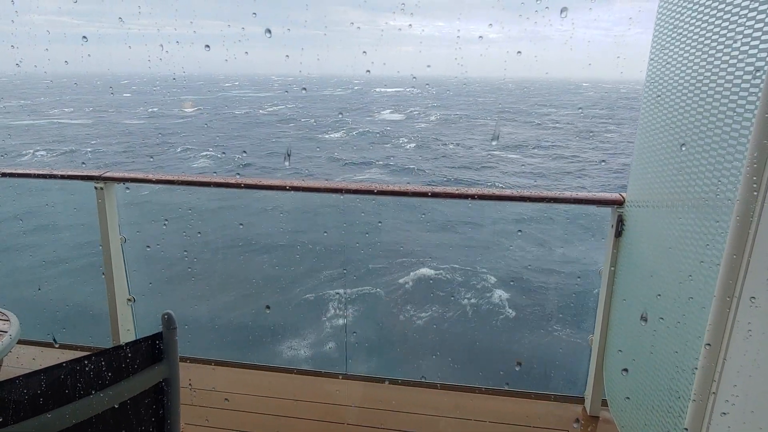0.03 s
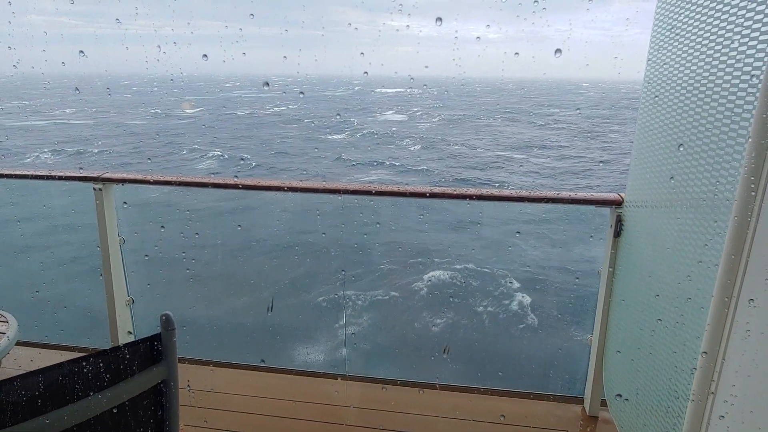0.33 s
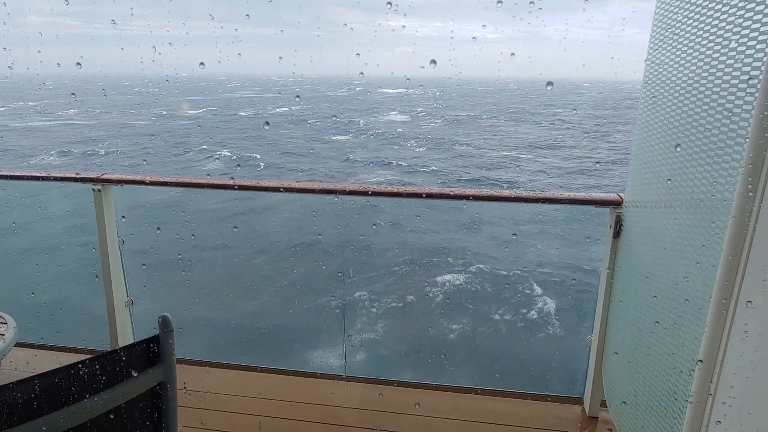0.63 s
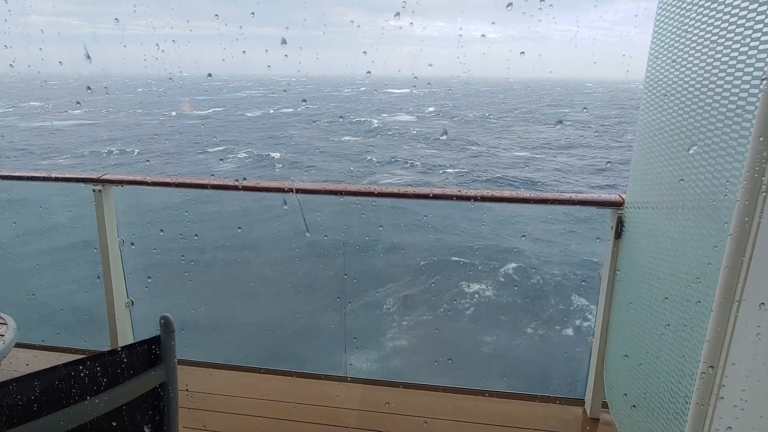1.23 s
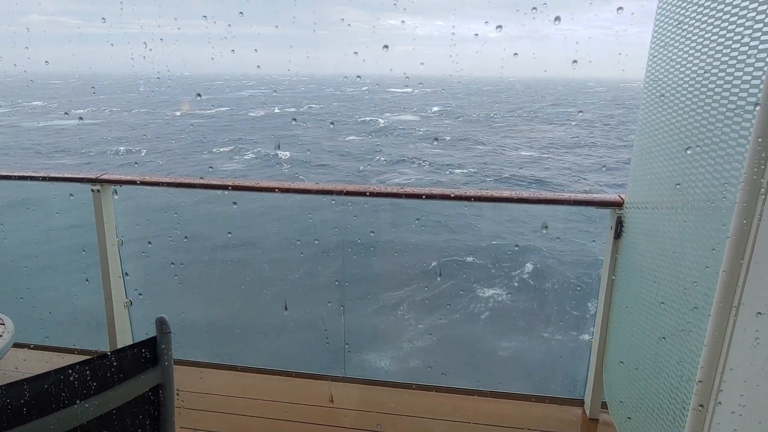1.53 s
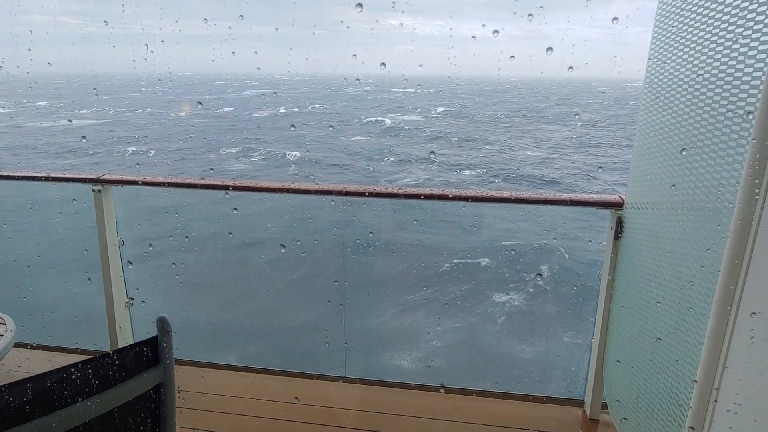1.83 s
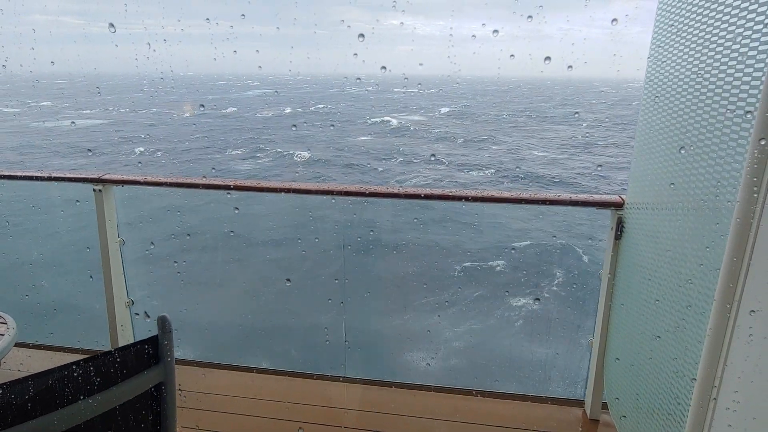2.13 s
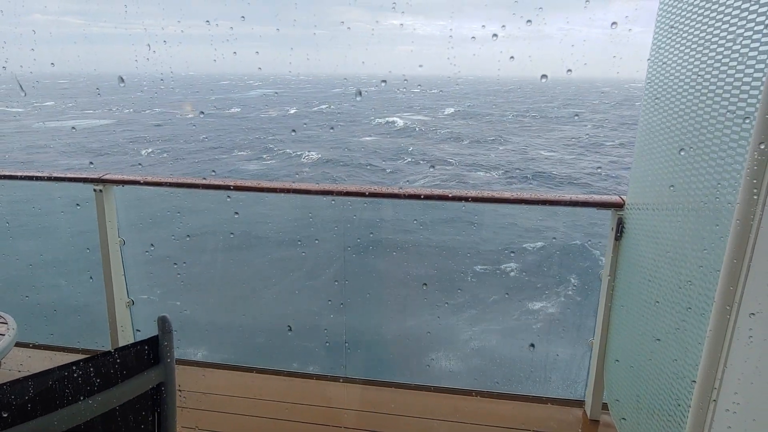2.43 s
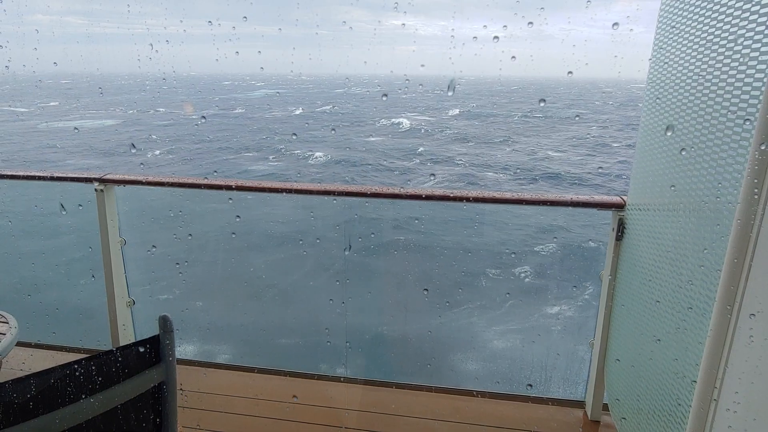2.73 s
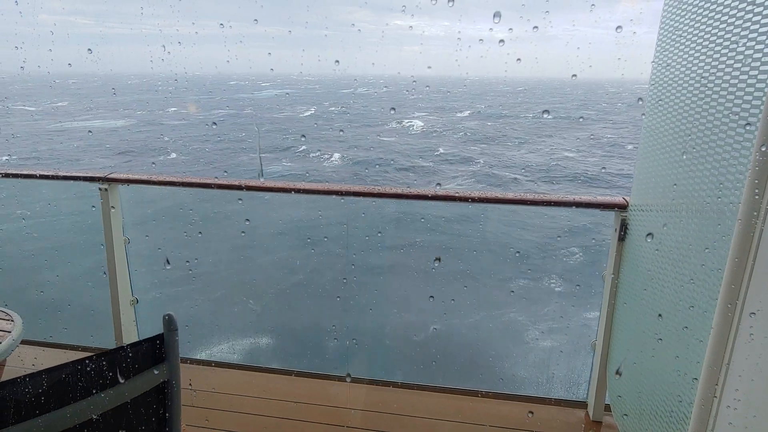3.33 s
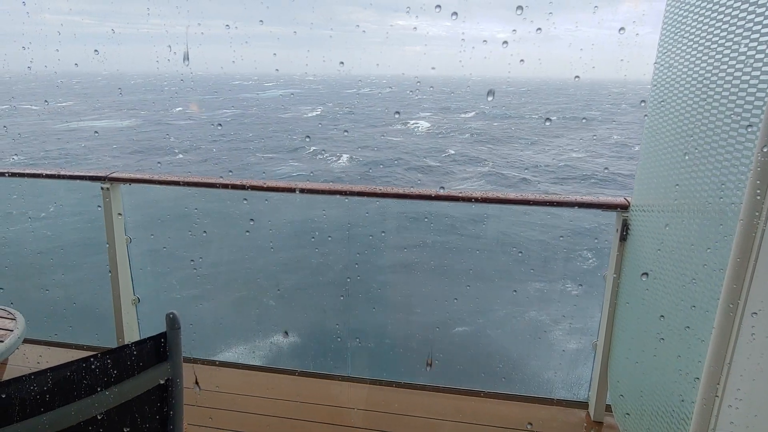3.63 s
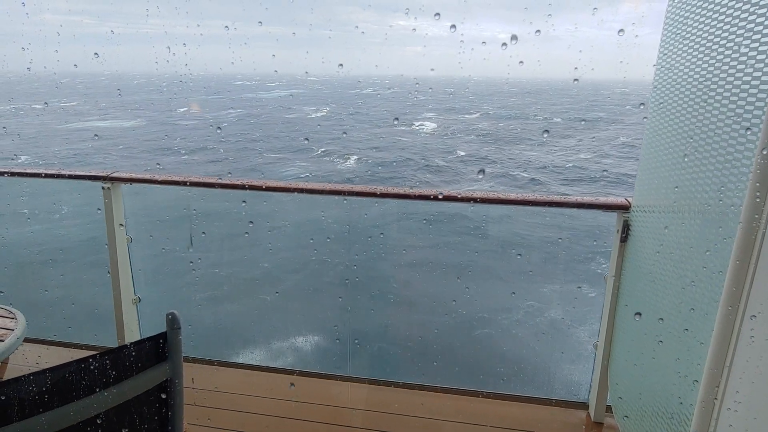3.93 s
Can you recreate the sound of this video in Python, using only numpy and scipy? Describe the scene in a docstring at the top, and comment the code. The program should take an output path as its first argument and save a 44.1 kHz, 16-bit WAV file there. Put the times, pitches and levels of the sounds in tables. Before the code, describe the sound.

A piercing wind whistle sputters through the gap of a ship's balcony door, close by, over hissing air, washing sea and a low rumble. Deep booms swell three times in the first 1.3 seconds. Gusts add a warbling shriek, strongest from 1.3 to 2.2 seconds. A raindrop taps at 1.5 seconds, with two fainter ones later. From about 2.7 seconds the wind eases and a thinner whistle carries on.

```python
"""A piercing, sputtering whistle: a gale blows through the gap of a balcony door on a ship in rough sea.
The jet oscillates against the edge of the gap, and air speed sets one pitch that these edge tones follow.
Strong gusts add a warbling shriek; in the lull the main whistle gives way to a higher one.
Turbulent air hisses in the gap over the wash of the sea, the ship's rumble and a deep boom of hull
and wind. Three raindrops tap the door."""
import sys
import numpy as np
from scipy import signal
from scipy.fft import rfft, irfft
from scipy.io import wavfile
from scipy.ndimage import uniform_filter1d

SR = 44100
rng = np.random.default_rng(int(sys.argv[2]) if len(sys.argv) > 2 else 0)


def generate_wav(signal):
    """Clip the signal to [-1, 1] and save it as 16-bit WAV at the path in sys.argv[1]."""
    frames = np.transpose(np.atleast_2d(signal))
    scaled = np.clip(frames, -1, 1) * 32767
    pcm = np.round(scaled).astype(np.int16)
    wavfile.write(sys.argv[1], SR, pcm)


N = 176400
T = np.arange(N) / SR


def amp(db):
    """Converts decibels to an amplitude ratio."""
    return 10 ** (np.asarray(db) / 20)


def unit(x):
    """Normalises a signal to an rms of 1."""
    return x / np.sqrt(np.mean(abs(x) ** 2) + 1e-20)


def curve(points):
    """Interpolates rows of time and value linearly over the scene."""
    return np.interp(T, *np.transpose(points))


def spectrum(points, hz):
    """Interpolates rows of frequency and value on a logarithmic frequency axis."""
    f, value = np.transpose(points)
    return np.interp(np.log(hz + 1), np.log(f + 1), value)


def wander(rate_hz, channels=1):
    """Random fluctuation: noise of unit rms, low-passed at rate_hz."""
    size = N // 32 + 2
    hz = np.fft.rfftfreq(size, 32 / SR)
    white = rfft(rng.standard_normal((channels, size)))
    slow = irfft(white / np.sqrt(1 + (hz / rate_hz) ** 4), size)
    return np.array([np.interp(np.linspace(0, size - 1, N), np.arange(size), unit(row)) for row in slow])


def waver(hz, share=.0035, rate_hz=14.1):
    """Random frequency modulation: a pitch strays by the given rms share of itself."""
    return hz * (1 + share * wander(rate_hz)[0])


def sputter():
    """Intermittency: the jet keeps losing its grip on the edge, and the tone dips for moments."""
    depth, abruptness = .55, 3
    return 1 - depth / (1 + np.exp(-abruptness * (wander(rate_hz=45)[0] - .5)))


def edge_tone(hz, width_hz, rough, left_delay_s=0.0004374):
    """Jet oscillation: a pure tone plus narrow-band turbulence, which has the share `rough` of the power."""
    rough = np.clip(rough, 0, 1)
    turbulence = unit(wander(width_hz / 2, channels=2) + 1j * wander(width_hz / 2, channels=2))
    path_phase = np.exp(-2j * np.pi * hz * left_delay_s * np.array([[1], [0]]))
    flutter_db = wander(rate_hz=35.5)  # turbulence shakes the level
    fading_db = 0.96 * wander(rate_hz=17, channels=2)  # shifting reflections fade each microphone
    blend = np.sqrt(1 - rough) * path_phase + np.sqrt(rough) * turbulence
    carrier = np.exp(2j * np.pi * np.cumsum(hz) / SR)
    return unit((amp(flutter_db + fading_db) * blend * carrier).real)


# The four strong tones of the gap. Each row: time in seconds, level in dB before the channel gains.
MAIN_LEVEL = [(0, -29), (.28, -26), (.55, -37), (.62, -29), (.77, -28.5), (.85, -43.5), (1.25, -33.5),
              (1.35, -26.5), (1.39, -34), (1.51, -25), (1.53, -33), (1.6, -21.5), (1.66, -40), (1.72, -41),
              (1.81, -27.5), (1.84, -29.5), (1.92, -36), (1.96, -50), (2.04, -37), (2.07, -27), (2.12, -23),
              (2.16, -37), (2.22, -28), (2.28, -30), (2.3, -40), (2.35, -28), (2.375, -48), (2.4, -24.5),
              (2.45, -40.5), (2.68, -43), (2.9, -90)]
LOWER_LEVEL = [(0, -40.5), (.77, -33.5), (.87, -56), (1.55, -46), (1.97, -51.5), (2.25, -39), (2.4, -49),
               (2.75, -70)]  # beats just below the main tone
UPPER_LEVEL = [(.78, -44), (.87, -45), (1.06, -40.5), (1.2, -46), (2.5, -47), (2.65, -34.5), (2.77, -29.5),
               (2.83, -39), (3.08, -31), (3.33, -40), (3.62, -30.5), (3.68, -39), (3.77, -26), (3.9, -31),
               (4, -33.5)]  # takes over in the lull
RIGHT_END_LEVEL = [(.78, -28.5), (.87, -35.5), (1.04, -38), (1.15, -31.5), (1.6, -28.5), (1.72, -35),
                   (1.8, -34), (2.55, -35), (2.8, -63)]  # from the right end of the gap; holds on between gusts


def whistles(pitch):
    """Edge tones at set ratios to one pitch: three heard on the left, one on the right."""
    main = amp(curve(MAIN_LEVEL)) * sputter() * edge_tone(pitch, width_hz=130, rough=.03)
    # The lower tone leaves the gap at another spot, so its path difference is its own.
    lower = amp(curve(LOWER_LEVEL)) * edge_tone(pitch * .948, width_hz=190, rough=.1, left_delay_s=.00038)
    upper = amp(curve(UPPER_LEVEL)) * sputter() * edge_tone(waver(pitch * 1.27), width_hz=27, rough=.04)
    right_end = amp(curve(RIGHT_END_LEVEL)) * sputter() * edge_tone(pitch * .99, width_hz=51, rough=.1)
    return (main * amp([[5.5], [-8]])  # channel gains: left, right
            + lower * amp([[7], [-6]])
            + upper * amp([[4.5], [-8]])
            + right_end * amp([[-11.5], [0]]))


# Weaker edge tones. Each row: ratio to the gap's pitch, level at best in dB, bandwidth in Hz,
# roughness (capped at 1), gap pitch where it speaks best in Hz, reach around that pitch in Hz.
WEAK_MODES = [(.645, -34.5, 145, 1, 3394, 316), (1.179, -34, 25, 0.15, 2870, 111),
              (1.201, -49.5, 69.9, 0.45, 2510, 200), (1.465, -51, 35.08, 0.4, 2960, 160),
              (1.51, -47, 35, 0.2, 3000, 202), (1.512, -45, 50, 0.2, 2606, 144),
              (1.679, -48, 110, 0.86, 3060, 149.8), (1.981, -39, 220, 1.1, 3590, 205),
              (2.54, -57, 30, 0.07, 2805, 189)]


def weak_tones(pitch):
    """Each mode of the jet speaks near its own air speed, so airy tones come and go with the pitch."""
    out = np.zeros((2, N))
    for ratio, db, width_hz, rough, best_hz, reach_hz in WEAK_MODES:
        speaks = np.exp(-.5 * ((pitch - best_hz) / reach_hz) ** 2)
        out += amp(db) * speaks * edge_tone(waver(pitch * ratio), width_hz, rough)
    return out * amp([[0.05], [-0.05]])


# The course of the shriek. Each row: time in seconds, pitch in Hz, level in dB.
SHRIEK_COURSE = [(0, 4200, -44), (.1, 4350, -34.5), (0.201, 4030, -38), (.42, 4350, -37.5),
                 (.52, 4460, -44), (.75, 4210, -37.5), (.85, 3766, -60), (1.28, 3753, -44),
                 (1.351, 4120, -33.5), (1.41, 3850, -30.5), (1.44, 4390, -34.5), (1.472, 4075, -35),
                 (1.51, 4250, -33), (1.59, 4306, -33.5), (1.639, 3864, -35), (1.682, 4090, -33),
                 (1.71, 3890, -38), (1.78, 4244, -34), (1.85, 3893, -34.5), (1.93, 3777, -40),
                 (2.2, 4030, -37.5), (2.548, 3840, -50), (2.7, 3530, -73)]
# Its tones. Each row: ratio to the shriek's pitch, relative level in dB.
SHRIEK_MODES = [(.89, -7), (0.951, -1.5), (1, -0.5), (1.58, -15.5)]


def shriek():
    """Jet instability: in strong gusts a cluster of tones warbles, each by itself, above the whistle."""
    times, hz, db = np.transpose(SHRIEK_COURSE)
    pitch = np.interp(T, times, hz)
    tones = np.zeros((2, N))
    for ratio, tone_db in SHRIEK_MODES:
        level = amp(tone_db) * sputter()
        warbling_hz = waver(pitch * ratio, share=.014, rate_hz=26)
        tones += level * edge_tone(warbling_hz, width_hz=58, rough=.1)
    return amp(np.interp(T, times, db)) * tones


# Likeness of the noise at the two microphones. Each row: frequency in Hz, correlation from -1 to 1.
CORRELATION = [(60, .99), (130, .97), (270, .85), (590, .64), (1250, 0), (2670, -.2), (5700, -.08),
               (12000, .04)]
# Its balance. Each row: frequency in Hz, left minus right level in dB.
BALANCE = [(60, 0.5), (250, -1), (640, 1.5), (1150, 5.5), (2070, -2), (3700, 18.5), (6750, -10.5),
           (12000, 3)]


def rush(colour, patchy_db, gusty_db, size):
    """Partly coherent stereo noise of unit rms, fluctuating in spectral patches and as a whole."""
    hop = size // 4
    frames, hz = N // hop + 5, np.fft.rfftfreq(size, 1 / SR)
    left_re, left_im, other_re, other_im, patches = rng.standard_normal((5, frames, len(hz)))
    patches = unit(uniform_filter1d(uniform_filter1d(patches, size=10, axis=0), size=8, axis=1))
    gusts = unit(uniform_filter1d(rng.standard_normal((frames, 1)), size=8, axis=0))
    correlation = np.clip(spectrum(CORRELATION, hz), -1, 1)
    left = left_re + 1j * left_im
    right = correlation * left + np.sqrt(1 - correlation ** 2) * (other_re + 1j * other_im)
    leftward = amp(spectrum(BALANCE, hz) / 2)
    gain = amp(spectrum(colour, hz) + patchy_db * patches + gusty_db * gusts)
    spectra = np.array([left * leftward, right / leftward]) * gain
    _, noise = signal.istft(spectra.transpose(0, 2, 1), nperseg=size, noverlap=size - hop)
    return unit(noise[:, :N])


# Strength of the hiss. Each row: time in seconds, relative level in dB.
HISS_LEVEL = [(0.0, -39.5), (0.23, -44.5), (0.56, -39), (0.73, -42), (0.86, -51), (1.34, -47.5),
              (1.57, -41), (1.67, -49.5), (1.8, -42.5), (1.85, -48), (2.18, -46), (2.73, -51.5),
              (2.74, -55.5), (3.38, -57), (4.0, -54.5)]
# Colour of the hiss as heard, with a deep notch near 8.7 kHz that does not come from the jet.
# Each row: frequency in Hz, relative spectral density in dB.
HEARD_HISS_SPECTRUM = [(500, -11.5), (1400, -4.5), (2300, 3.5), (2800, -2), (3500, -3.5), (4200, -0.5),
                       (5200, -1), (5800, -9), (7200, -4.5), (8000, -18), (8700, -44.5), (9800, -19.5),
                       (10500, -26.5), (11700, -18), (12500, -40)]


def jet_hiss():
    """Turbulence in the gap radiates broadband noise, shaped here to the colour that the listener hears."""
    return amp(10 + curve(HISS_LEVEL)) * rush(HEARD_HISS_SPECTRUM, patchy_db=2.2, gusty_db=-0.76, size=512)


# Strength of the sea's wash. Each row: time in seconds, level in dB.
WASH_LEVEL = [(2.4, -37.5), (3.3, -40)]
# Its colour. Each row: frequency in Hz, relative spectral density in dB.
WASH_SPECTRUM = [(100, -3), (300, -3.5), (600, 2.5), (1100, 3.5), (1450, 1.5), (2100, 7), (3000, 0),
                 (4200, -8.5), (5500, -12), (8200, -37), (8800, -80)]


def sea_wash():
    """Rough sea is heard as mid-band noise under slight random amplitude modulation."""
    return amp(curve(WASH_LEVEL)) * rush(WASH_SPECTRUM, patchy_db=0.04, gusty_db=1.4, size=1024)


# Colour of the ship's rumble. Each row: frequency in Hz, relative spectral density in dB.
RUMBLE_SPECTRUM = [(20, -22.5), (80, -7), (102, -9.5), (135, -7.5), (165, -14), (250, -19), (440, -19),
                   (510, -37.5), (1500, -85)]


def ship_rumble():
    """Random vibration of the ship is heard as low-frequency noise of constant mean level."""
    return amp(-38) * rush(RUMBLE_SPECTRUM, patchy_db=1.7, gusty_db=1.38, size=4096)


# Strength of the boom. Each row: time in seconds, level in dB.
BOOM_SWELLS = [(0, -39), (.2, -30), (.46, -36), (.65, -30.5), (.85, -37), (1.08, -29), (1.3, -37),
               (3.5, -38.5)]
# Its colour. Each row: frequency in Hz, relative spectral density in dB.
BOOM_SPECTRUM = [(15, -29), (30, -8), (43, 3), (56, -7), (70, -11), (400, -81)]


def hull_boom():
    """Hull and wind make band-limited noise that peaks near 43 Hz and swells three times early on."""
    return amp(curve(BOOM_SWELLS)) * rush(BOOM_SPECTRUM, patchy_db=0.5, gusty_db=1.5, size=4096)


# Raindrops on the door. Each row: start in seconds, level in dB, band centre in Hz,
# pan in dB (added on the left, taken off on the right).
RAINDROPS = [(1.524, -24, 2010, 4), (1.917, -44.5, 9500, -2), (3.776, -42, 4480, 2.5)]


def raindrops():
    """Each impact is a heavily damped burst of noise, coloured by the spot that the drop hits."""
    spread, decay_s = 1.3, .003
    out = np.zeros((2, N))
    for start, db, hz, pan_db in RAINDROPS:
        band = signal.butter(2, [hz / spread, hz * spread], "bandpass", fs=SR, output="sos")
        noise = unit(signal.sosfilt(band, rng.standard_normal((2, N))))
        envelope = (T >= start) * np.exp(-abs(T - start) / decay_s)
        out += amp(db) * amp([[pan_db], [-pan_db]]) * noise * envelope
    return out


# The pitch of the gap, which follows the air speed. Each row: time in seconds, frequency in Hz.
GAP_PITCH = [(0.0, 3340), (0.14, 3250), (0.28, 3200), (0.44, 3420), (0.54, 3528), (0.75, 3307),
             (0.82, 3055), (0.95, 2890), (1.15, 3070), (1.21, 3007), (1.36, 3157), (1.4, 3076),
             (1.43, 3142), (1.6, 3175), (1.66, 3018), (1.81, 3166), (1.95, 2996), (2.03, 3058),
             (2.08, 3180), (2.16, 3087), (2.2, 3190), (2.36, 3067), (2.53, 3020), (2.57, 2888),
             (2.76, 2558), (2.88, 2603), (3.4, 2460), (3.7, 2563), (3.85, 2658), (3.97, 2480)]


def scene():
    """Superposition: tones and taps at the door add to the noise of jet, sea and ship."""
    pitch = waver(curve(GAP_PITCH), share=0.00478, rate_hz=60.6)  # turbulence shakes the pitch
    noise = jet_hiss() + sea_wash() + ship_rumble() + hull_boom()
    return whistles(pitch) + weak_tones(pitch) + shriek() + noise + raindrops()


def record(dry):
    """Band limiting: a linear-phase low-pass filter removes the highest treble."""
    cutoff_hz = 12400
    lowpass = signal.firwin(511, cutoff_hz, window=("kaiser", 9), fs=SR)
    return signal.oaconvolve(dry, lowpass[None], "same")


dry = scene()
out = record(dry)
generate_wav(out)
```